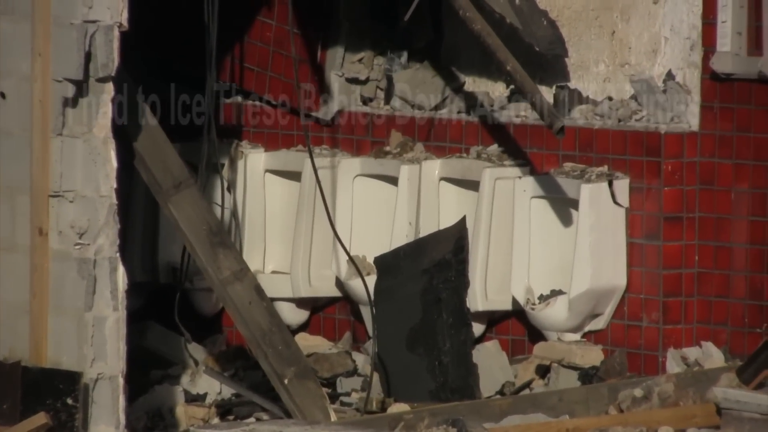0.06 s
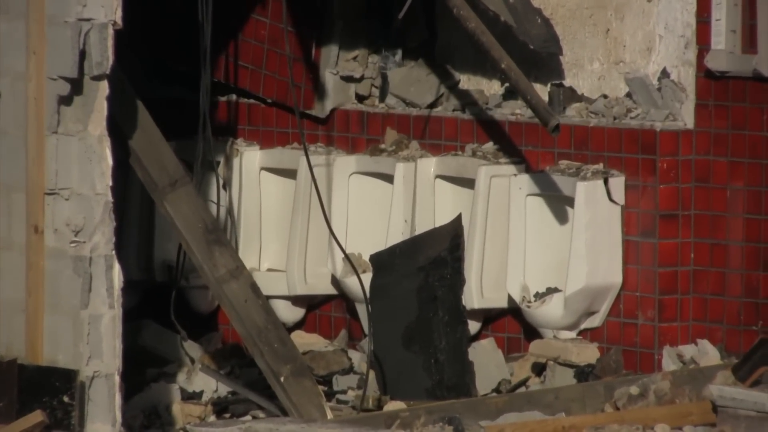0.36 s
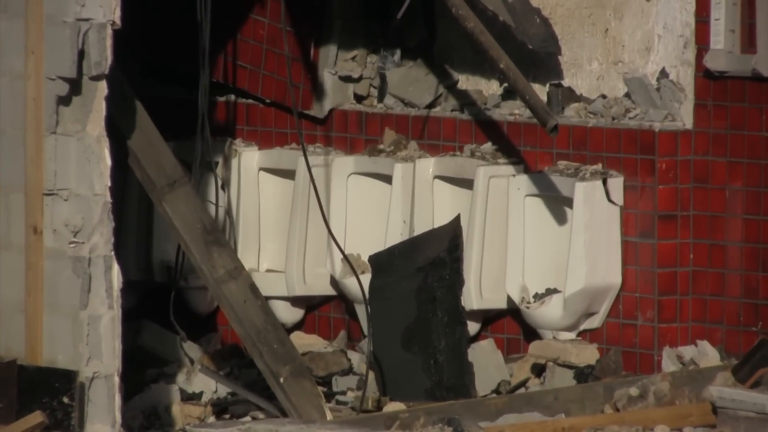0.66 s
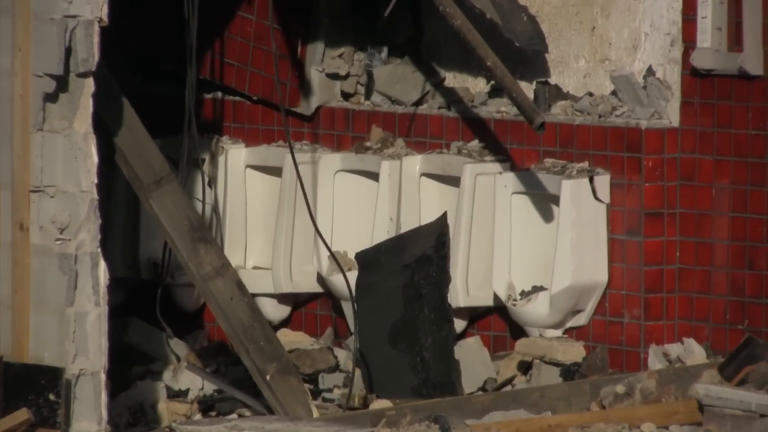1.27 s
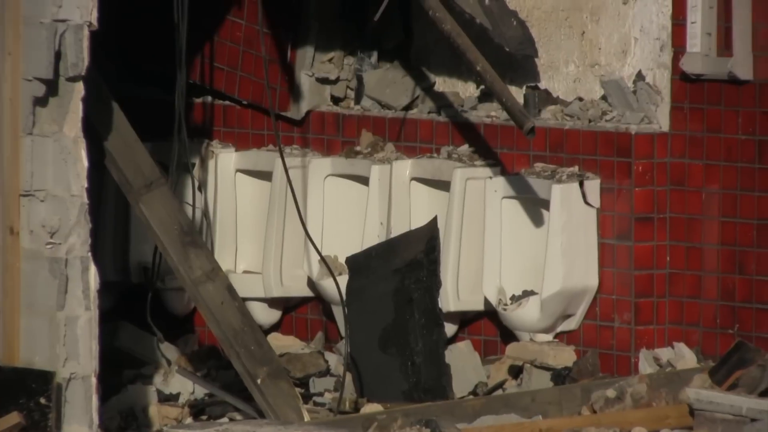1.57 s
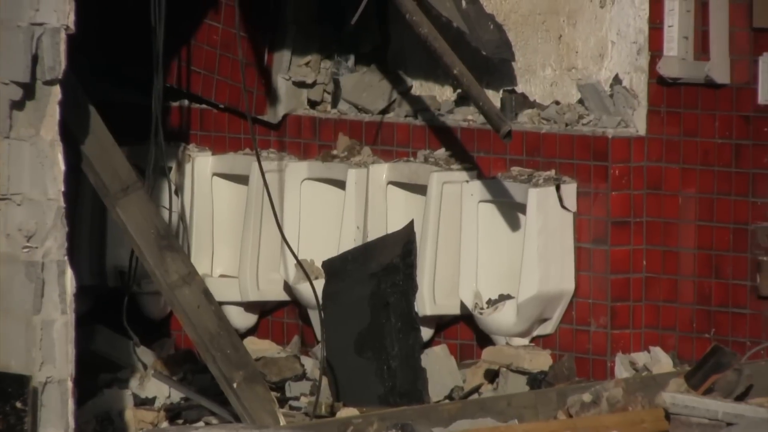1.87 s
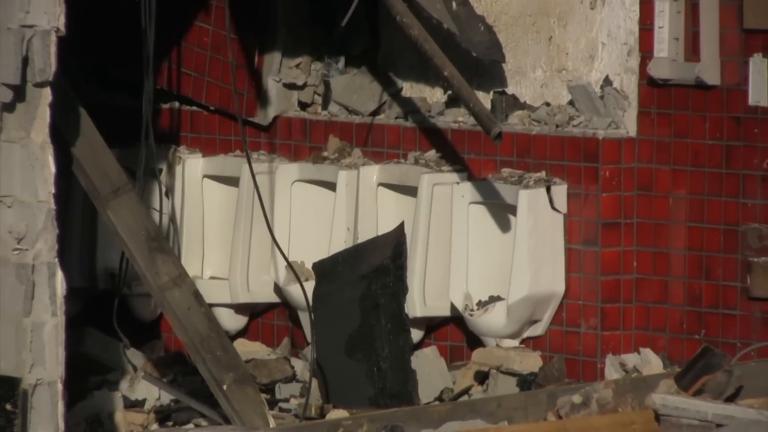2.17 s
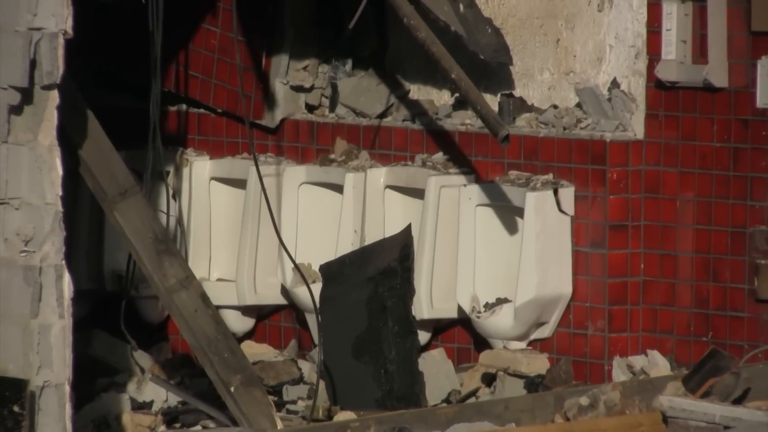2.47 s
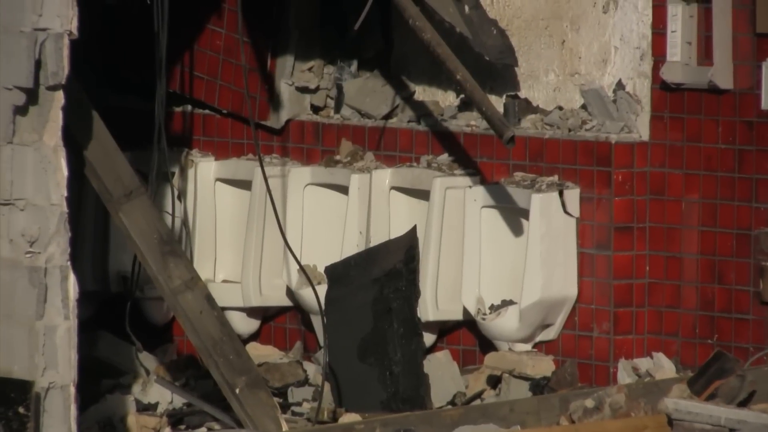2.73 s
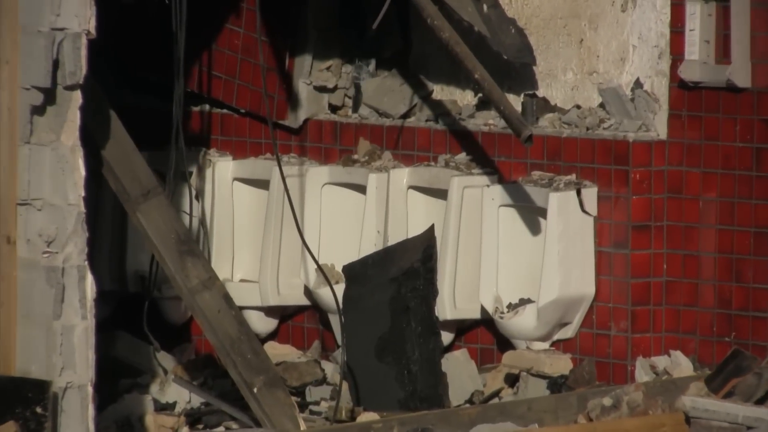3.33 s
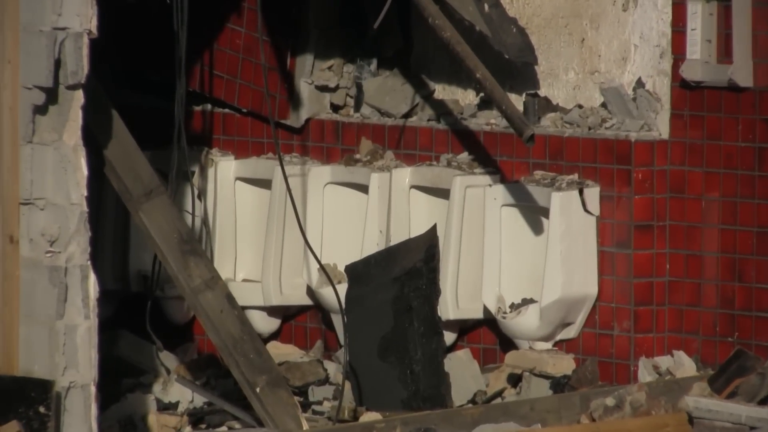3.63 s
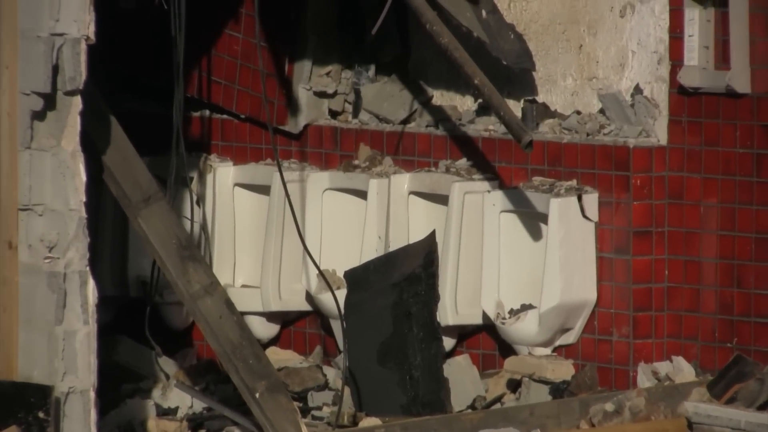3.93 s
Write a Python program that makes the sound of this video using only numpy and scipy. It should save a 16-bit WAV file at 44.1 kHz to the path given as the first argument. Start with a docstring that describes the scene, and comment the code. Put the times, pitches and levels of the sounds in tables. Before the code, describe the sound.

A diesel machine drones some way off on a demolition site, slowly sagging in pitch. Rubble knocks dully twice early on and metal squeals faintly, while soft hiss and a thin whine sit close to the microphone.

```python
"""From the start a diesel machine drones some way off on a demolition site, over low rumble;
close by, a camera's tape drum hums and its tape drive whines thinly over soft hiss.
Rubble knocks dully at 0.2 s and 1 s, and metal squeals faintly from 0.4 s to about 2 s.
Near 2.4 s some grit slides. The exhaust note sags in pitch to the end as the load eases."""
import sys
import numpy as np
from scipy import signal
from scipy.fft import rfft, irfft, next_fast_len
from scipy.io import wavfile
from scipy.ndimage import map_coordinates

SR = 44100
rng = np.random.default_rng(int(sys.argv[2]) if len(sys.argv) > 2 else 0)


def waveform_to_disk(signal):
    """Save audio, clipped to [-1, 1], as 16-bit WAV at the path in sys.argv[1]."""
    frames = np.transpose(np.atleast_2d(signal))
    scaled = np.clip(frames, -1, 1) * 32767
    samples = np.round(scaled).astype(np.int16)
    wavfile.write(sys.argv[1], SR, samples)


N = 176400


def amp(db):
    """Decibels to gain."""
    return 10 ** (np.asarray(db) / 20)


def unit(x):
    """Scale to rms 1."""
    return x / np.sqrt(np.mean(x ** 2) + 1e-20)


def curves(rows):
    """Per-sample curve of each column after time_s."""
    time_s, *columns = np.transpose(rows)
    return [np.interp(np.arange(N) / SR, time_s, column) for column in columns]


def wobble(rate_hz):
    """Smooth random curve, rate_hz knots a second."""
    knots = rng.standard_normal(int(N * rate_hz / SR) + 4)
    return map_coordinates(knots, [np.arange(N) * rate_hz / SR])


def shaped(x, colour):
    """Filter by (freq_hz, gain_db) points on a log frequency axis."""
    size = next_fast_len(N + SR // 2)
    freq_hz, gain_db = np.transpose(colour)
    bin_hz = np.fft.rfftfreq(size, 1 / SR)
    bin_db = np.interp(np.log(bin_hz + 1), np.log(freq_hz + 1), gain_db)
    return irfft(rfft(x, size) * amp(bin_db), size)[..., :N]


def lowpass(x, cutoff_hz, order):
    """Butterworth low-pass."""
    return signal.sosfilt(signal.butter(order, cutoff_hz, fs=SR, output="sos"), x)


def tone(hz):
    """Sine of rms 1 following hz, random phase."""
    cycles = np.cumsum(hz * np.ones(N)) / SR
    return np.sqrt(2) * np.sin(2 * np.pi * (cycles + rng.random()))


def stereo_noise(colour, width):
    """Coloured mid/side noise of rms 1."""
    mid, side = shaped(rng.standard_normal((2, N)), colour)
    side = shaped(side, width)
    return unit(np.array([mid + side, mid - side]))


# Hiss spectrum: freq_hz, gain_db
HISS_COLOUR = [(500, -13.5), (2500, 3), (5000, 2.5), (7200, 3), (8100, -0.5), (8600, 1.5), (10500, -4),
               (11400, -9), (12100, -1.5), (12500, -20)]
# Hiss stereo width: freq_hz, side_minus_mid_db
HISS_WIDTH = [(3000, -20), (9000, 3), (12000, 2)]

def hiss(level_db=-70.5):
    """Soft steady hiss, wider in the treble."""
    return amp(level_db) * stereo_noise(HISS_COLOUR, HISS_WIDTH)


# Tape drive tones: pitch_hz, relative_db
WHINE_TONES = [(3101, -81), (3677, -89), (4048, -90), (4673, -92), (5394, -91), (5694, -91), (5994, -90),
               (6294, -92), (6594, -95), (8758, -91), (9265, -95), (9357, -91), (9593, -95), (9943, -99),
               (11386, -102), (11698, -101), (11940, -98), (11971, -93), (12091, -100), (12134, -99)]
# Tape drive buzz spectrum: freq_hz, gain_db
BUZZ_COLOUR = [(2000, -23), (2900, -1), (4200, -4), (5500, -9), (8400, -6), (9200, 7), (10200, -10),
               (11400, -16), (12000, -4), (12500, -10)]

def tape_drive(whine_gain_db=8.5, buzz_hz=59.94, buzz_db=-78.5):
    """Thin wavering tones and a cyclic buzz from the mechanism, on the right."""
    whine = sum(amp(db + 1.1 * wobble(6.1)) * tone(hz + 1.43 * wobble(8.07)) for hz, db in WHINE_TONES)
    cycle = rng.standard_normal(round(SR / buzz_hz))
    buzz = unit(shaped(np.resize(cycle, N), BUZZ_COLOUR))
    pan = np.array([[-0.069], [1]])  # left: faint, opposite phase
    return pan * (amp(whine_gain_db) * whine + amp(buzz_db) * buzz)


# Tape drum hum: pitch_hz, level_db
DRUM_HUM_TONES = [(39.9, -58), (49.8, -58.5)]

def drum_hum():
    """Two low hum tones from the tape drum, beating together."""
    return sum(amp(db + 0.65 * wobble(3.3)) * tone(hz) for hz, db in DRUM_HUM_TONES)


# Outdoor stereo width: freq_hz, side_minus_mid_db
OUTDOOR_WIDTH = [(50, -6), (280, -20), (600, -14), (1200, -9.5), (2500, -10), (5000, -8)]
# Site rumble spectrum: freq_hz, gain_db
RUMBLE_COLOUR = [(20, -35), (35, -28), (50, -10.5), (66, -5), (84, 5.5), (102, 4.5), (135, -6), (250, -8),
                 (800, -51), (2000, -120)]

def site_rumble(level_db=-46):
    """Steady low rumble of the site."""
    return amp(level_db) * stereo_noise(RUMBLE_COLOUR, OUTDOOR_WIDTH)


# Sliding grit spectrum: freq_hz, gain_db
GRIT_COLOUR = [(2000, -27), (3700, 4), (5000, -1), (7000, -12), (10000, -28)]

def grit(centre_s=2.44, sigma_s=.06, level_db=-69.5):
    """Sliding grit: one brief swell of bright noise."""
    swell = np.exp(-((np.arange(N) / SR - centre_s) / sigma_s) ** 2 / 2)
    return amp(level_db) * swell * stereo_noise(GRIT_COLOUR, OUTDOOR_WIDTH)


# Metal squeal contour: time_s, pitch_hz, level_db
SQUEAL_PATH = [(.4, 1850, -69), (.6, 1826, -58), (.76, 1790, -59), (.88, 1588, -56), (1.05, 1545, -58.5),
               (1.2, 1585, -59), (1.37, 1453, -55.5), (1.65, 1490, -66), (1.9, 1460, -68),
               (2.2, 1560, -100)]

def metal_squeal(roughness_hz=210):
    """Faint rough squeal: a narrow noise band, falling in pitch."""
    pitch_hz, level_db = curves(SQUEAL_PATH)
    envelope = amp(level_db + 0.75 * wobble(12.2))
    return envelope * unit(wobble(roughness_hz) * tone(pitch_hz + 25 * wobble(40)))


# Rubble impacts: start_s, peak_db, ring_t60_s, cutoff_hz
KNOCKS = [(.2342, -27.7, .022, 1700), (1.0204, -25, .007, 2090)]
# Rubble resonances: pitch_hz, relative_db
RUBBLE_MODES = [(590, 0), (770, 1.5), (1120, -13), (1480, -4.5)]

def rubble(crack_gain_db=-5, crack_t60_s=.0038, wall_gain_db=-7, wall_t60_s=.25):
    """Dull knocks: a contact crack and a brief ring, reflected by broken walls."""
    knocks = np.zeros(N + SR)
    t = np.arange(SR // 2) / SR
    for start_s, peak_db, ring_t60_s, cutoff_hz in KNOCKS:
        modes = sum(amp(db) * np.sin(2 * np.pi * (hz * t + rng.random())) for hz, db in RUBBLE_MODES)
        ring = amp(-60 * t / ring_t60_s) * modes
        noise = unit(lowpass(rng.standard_normal(len(t)), cutoff_hz, order=4))
        crack = amp(crack_gain_db - 60 * t / crack_t60_s) * noise
        knock = lowpass(ring + crack, cutoff_hz, order=6)
        knocks[round(start_s * SR):][:len(t)] += amp(peak_db) * knock / np.abs(knock).max()
    tail = rng.standard_normal((2, len(t))) * amp(-60 * t / wall_t60_s)
    reflections = signal.fftconvolve(knocks[None], tail / np.linalg.norm(tail[0]), axes=1)
    return knocks[:N] + amp(wall_gain_db) * reflections[:, :N]


# Diesel firing rate: time_s, rate_hz
FIRING_RATE = [(0, 118.4), (.4, 118), (.65, 117.3), (1.1, 116.5), (1.4, 116.2), (1.7, 115.4), (2.25, 114.5),
               (2.6, 114.3), (3.1, 113.5), (3.5, 112.7), (4, 112.4)]
# Firing note: time_s, level_db
BOOM_LEVEL = [(0, -39.5), (.13, -37.4), (.38, -37.3), (.55, -39.3), (.75, -35.7), (1.03, -36.2),
              (1.25, -38.4), (1.55, -39.8), (1.68, -41.5), (1.8, -39), (2.03, -38), (2.3, -45),
              (2.5, -44.5), (2.95, -48), (3.38, -43), (4, -46.5)]
# Second harmonic: time_s, level_db
OCTAVE_LEVEL = [(0, -43.5), (.12, -43.5), (.24, -50), (.42, -42), (.65, -52.5), (1, -47.5), (1.3, -46.5),
                (1.62, -42.8), (1.88, -47), (2.1, -58), (4, -61)]
# Third harmonic: time_s, level_db
RASP_LEVEL = [(0, -44), (.3, -44), (.6, -46.5), (.85, -44.5), (1, -45.5), (1.22, -42.5), (1.52, -40.5),
              (1.75, -47), (2.08, -41), (2.3, -48), (2.47, -43.3), (2.72, -44), (2.86, -51.5), (3.3, -54.5),
              (3.6, -47.5), (4, -53.5)]
# Weaker overtones: firing_multiple, start_db, end_db
OVERTONES = [(1.5, -55.5, -54.5), (4, -48, -52), (5, -56.5, -60), (6, -56.5, -78), (7, -57.5, -69)]
# Machine roar: time_s, level_db
ROAR_LEVEL = [(0, -40.5), (.3, -39.5), (.6, -40), (1.05, -40), (1.5, -40), (2.05, -40), (2.5, -41.5),
              (3, -41), (3.5, -41.5), (4, -42)]
# Roar spectrum: freq_hz, gain_db
ROAR_COLOUR = [(60, -37), (130, -2), (200, -1.5), (290, .5), (400, -3), (520, -3.5), (680, -5.7), (820, -6),
               (1000, -9), (1500, -13.5), (2000, -21.5), (2600, -27.5), (4000, -36.5), (8000, -59),
               (12000, -120)]

def diesel(jitter_hz=.15, boom_flutter_db=.7, overtone_flutter_db=1.6, chuff_depth=.12):
    """Slowing exhaust: firing note, overtones and a roar that pulses with the firing."""
    firing_hz = curves(FIRING_RATE)[0] + jitter_hz * wobble(12)
    boom = amp(curves(BOOM_LEVEL)[0] + boom_flutter_db * wobble(14)) * tone(firing_hz)
    octave = amp(curves(OCTAVE_LEVEL)[0]) * tone(2 * firing_hz)
    rasp = amp(curves(RASP_LEVEL)[0]) * tone(3 * firing_hz)
    overtones = np.zeros(N)
    for multiple, start_db, end_db in OVERTONES:
        level_db = np.linspace(start_db, end_db, N) + overtone_flutter_db * wobble(9.09)
        overtones += amp(level_db) * tone(multiple * firing_hz)
    noise = stereo_noise(ROAR_COLOUR, OUTDOOR_WIDTH)
    chuff = 1 + chuff_depth * tone(firing_hz)
    roar = amp(curves(ROAR_LEVEL)[0]) * unit(noise * chuff)
    return boom + octave + rasp + overtones + roar


def scene(pan_left_db=.5):
    """Site and drum hum slightly left, tape drive right, hiss all round."""
    panned = diesel() + site_rumble() + drum_hum() + rubble() + metal_squeal() + grit()
    return panned * amp([[pan_left_db], [-pan_left_db]]) + tape_drive() + hiss()


def record(dry):
    """100-sample fade-in, steep low-pass at 12550 Hz."""
    fade_in = np.minimum(np.arange(N) / 100, 1)
    return signal.sosfilt(signal.cheby1(16, .1, 12550, fs=SR, output="sos"), dry * fade_in)


dry = scene()
out = record(dry)
waveform_to_disk(out)
```